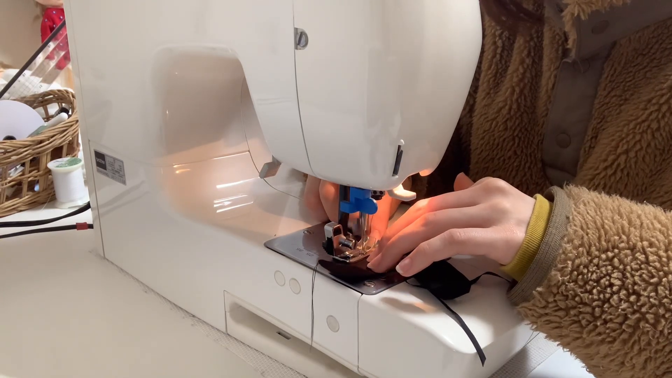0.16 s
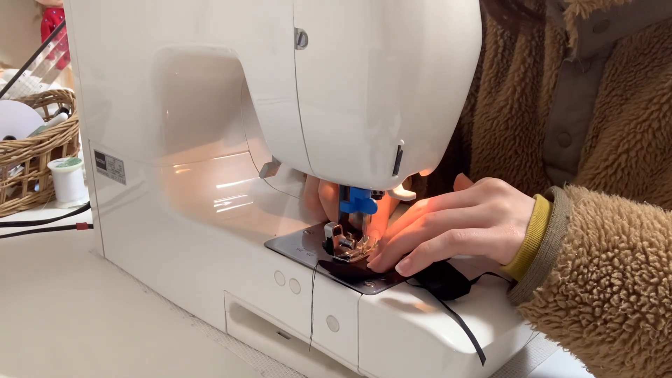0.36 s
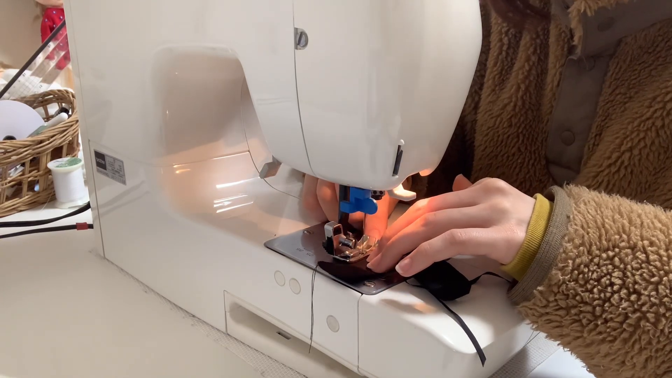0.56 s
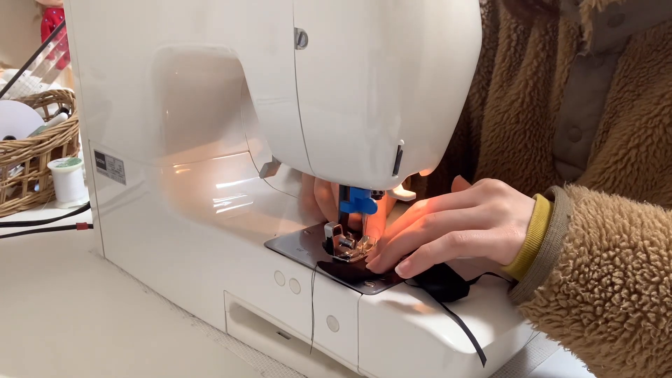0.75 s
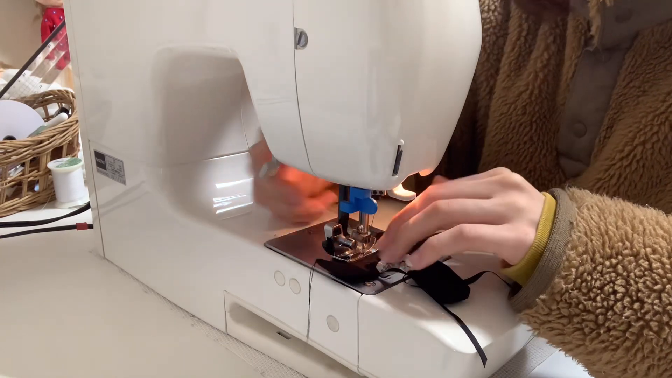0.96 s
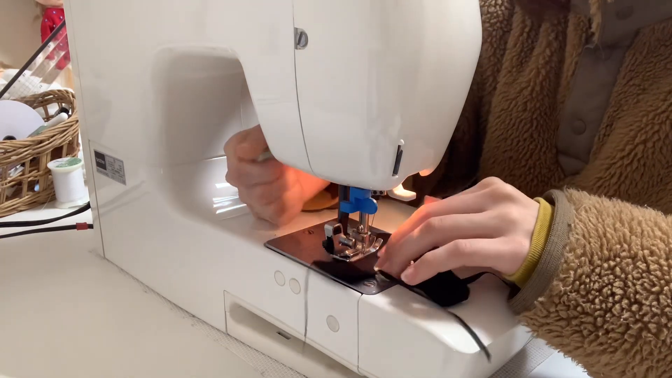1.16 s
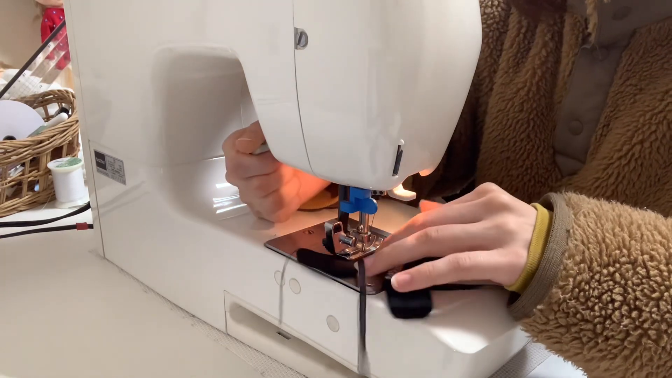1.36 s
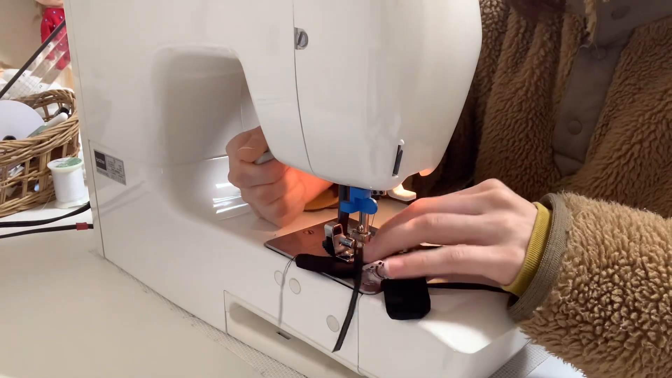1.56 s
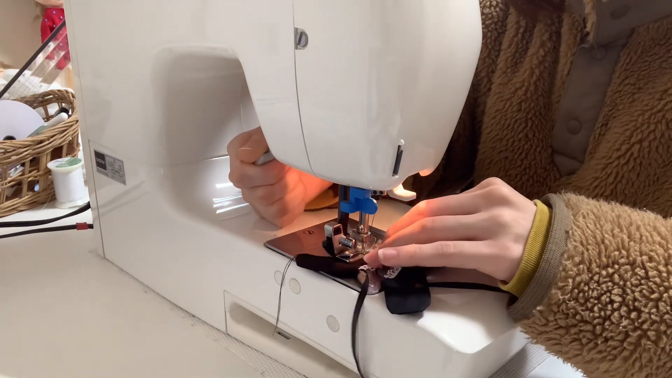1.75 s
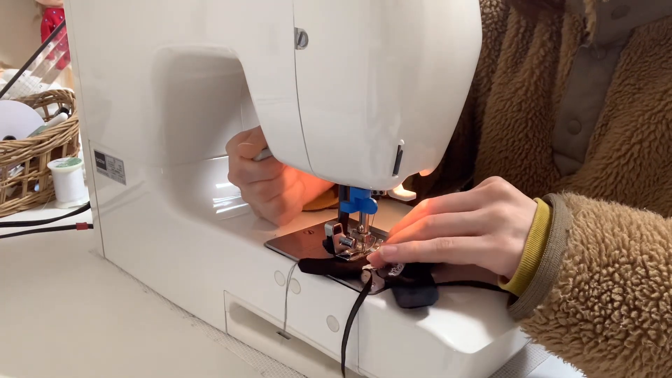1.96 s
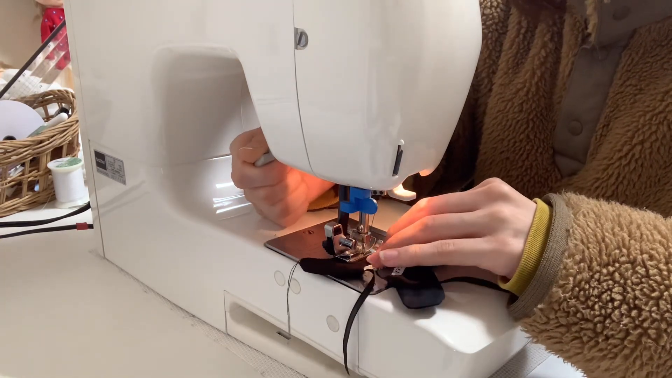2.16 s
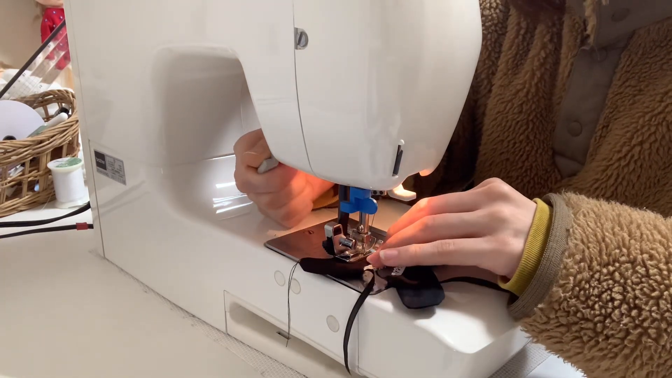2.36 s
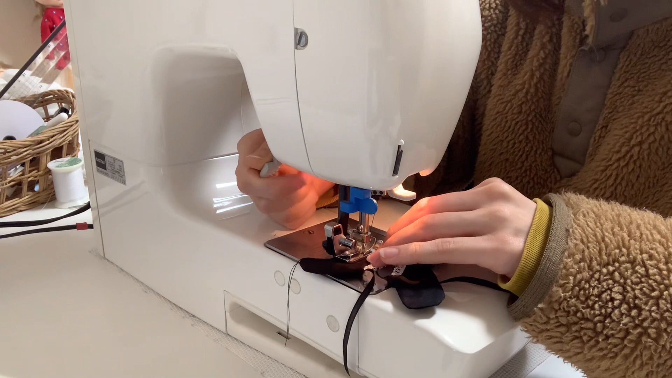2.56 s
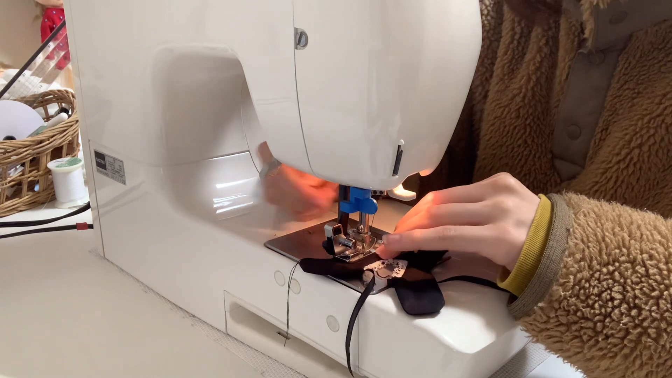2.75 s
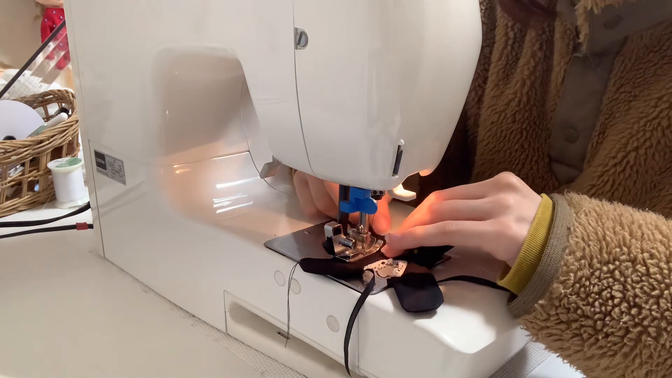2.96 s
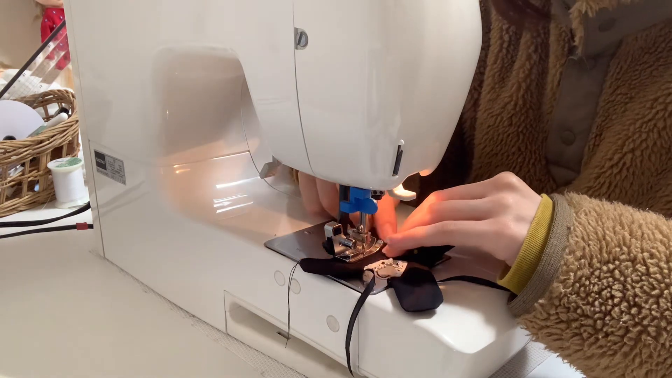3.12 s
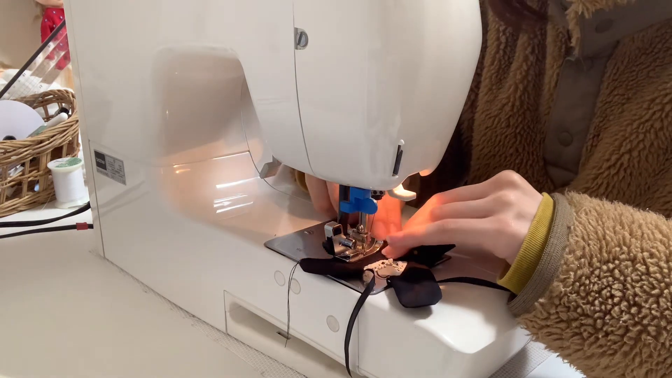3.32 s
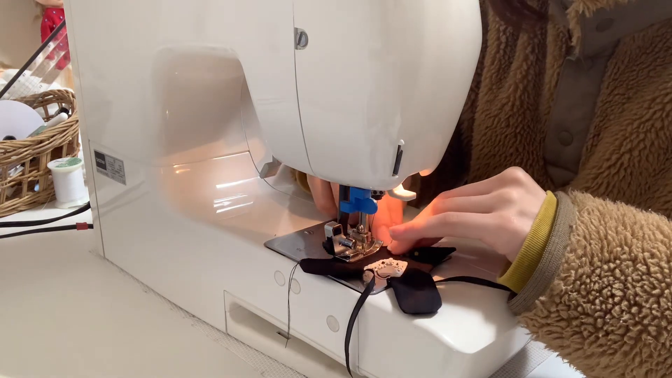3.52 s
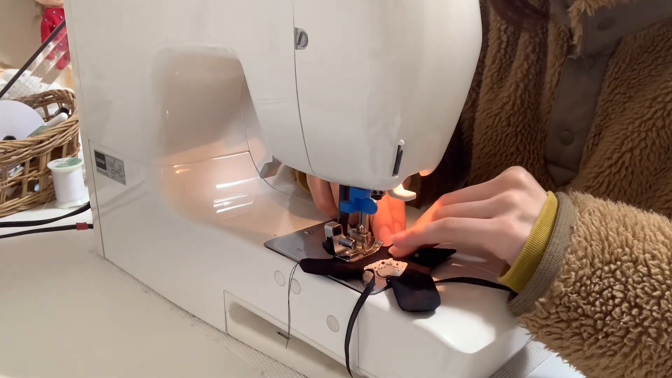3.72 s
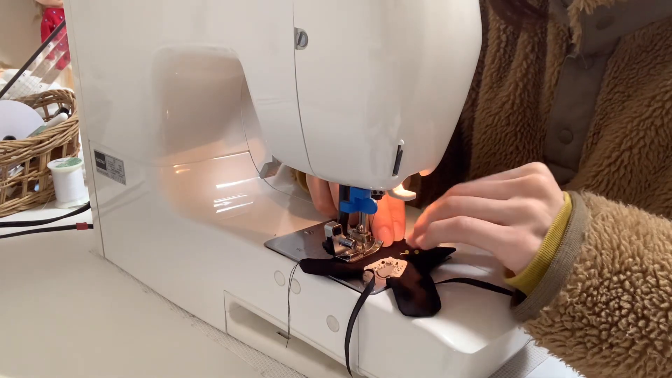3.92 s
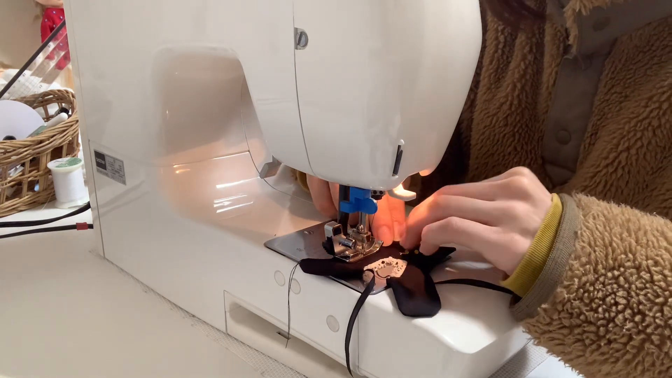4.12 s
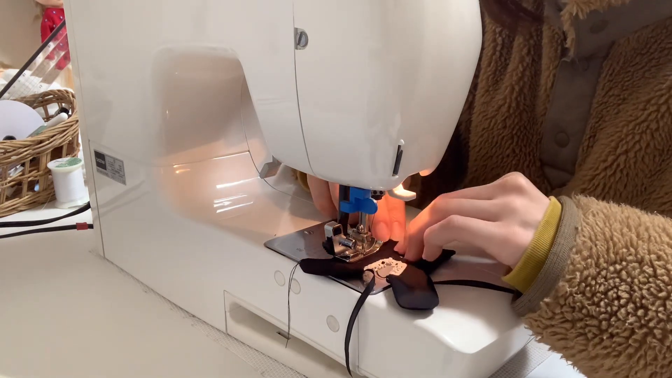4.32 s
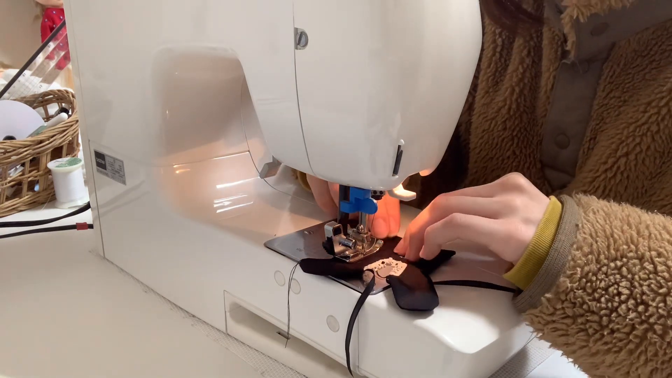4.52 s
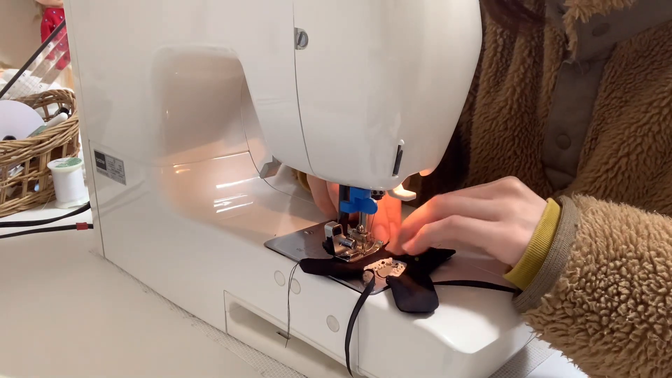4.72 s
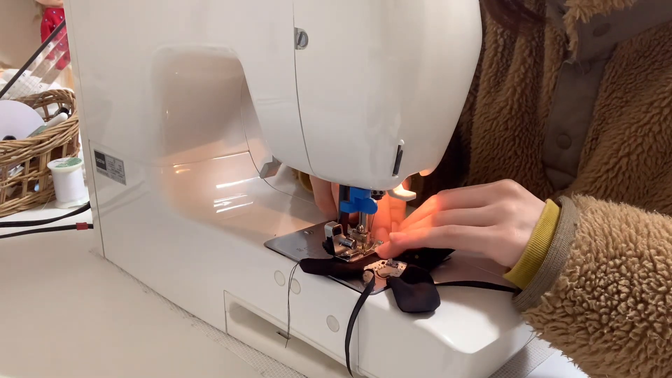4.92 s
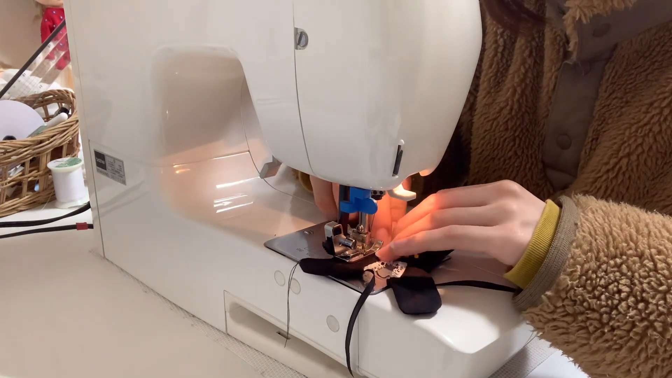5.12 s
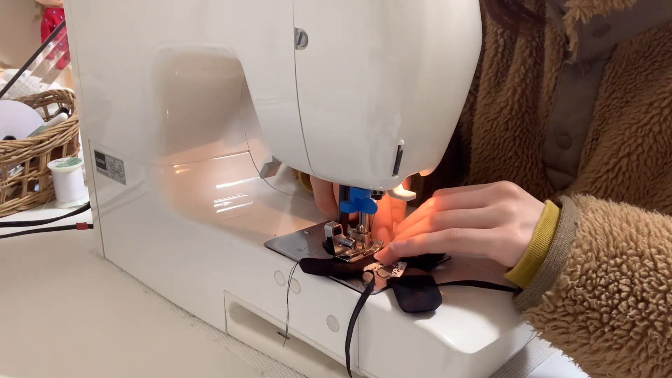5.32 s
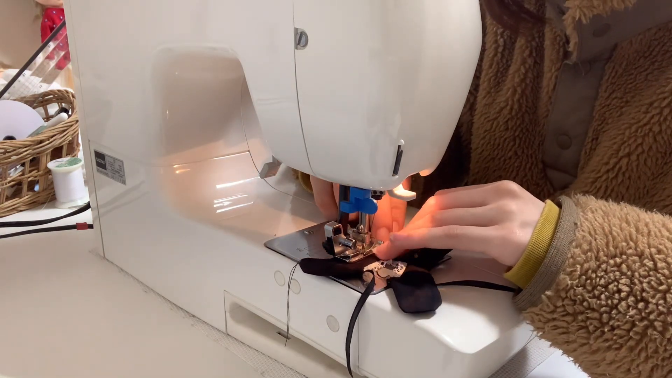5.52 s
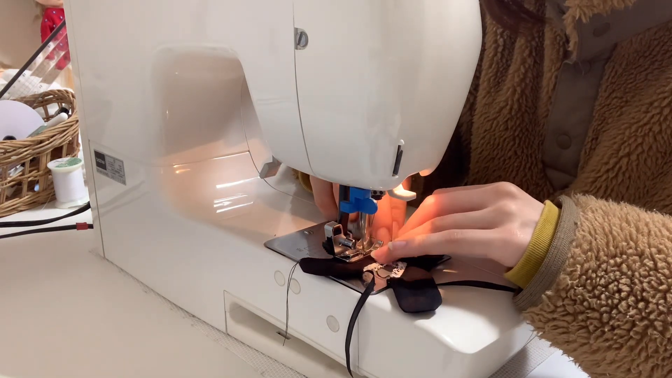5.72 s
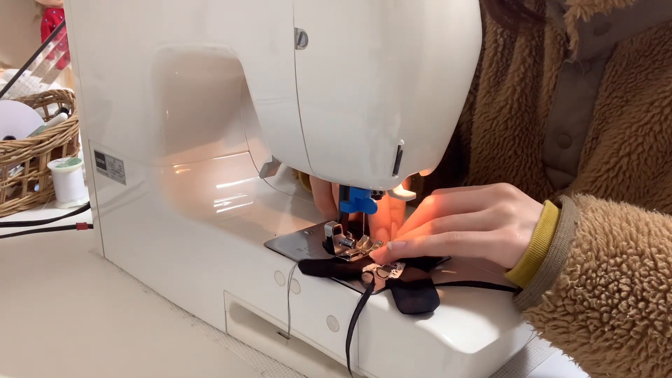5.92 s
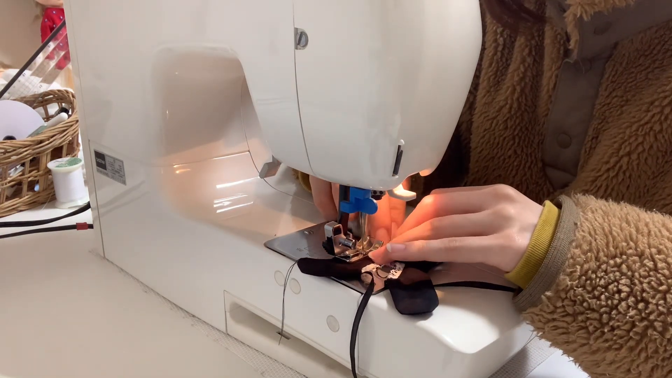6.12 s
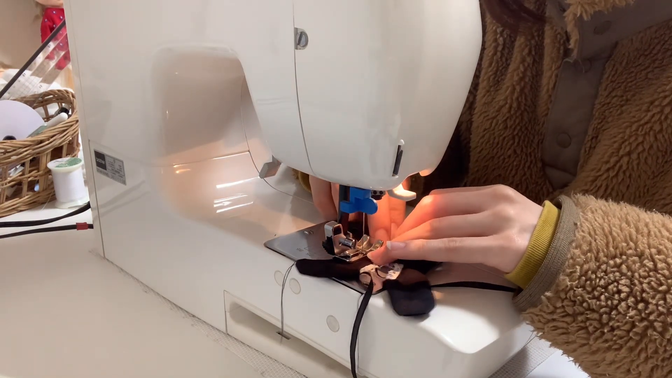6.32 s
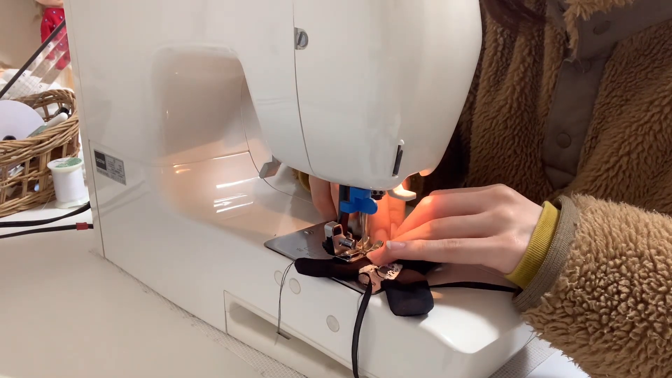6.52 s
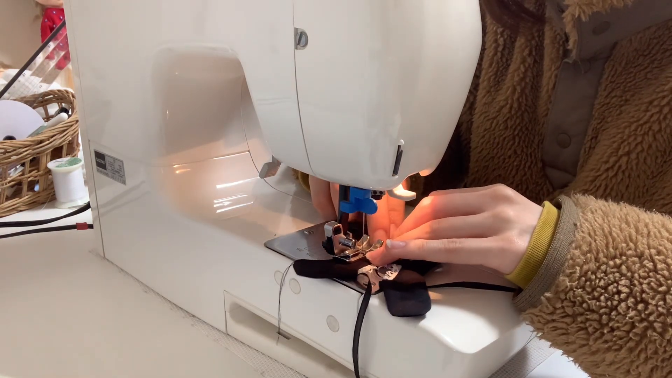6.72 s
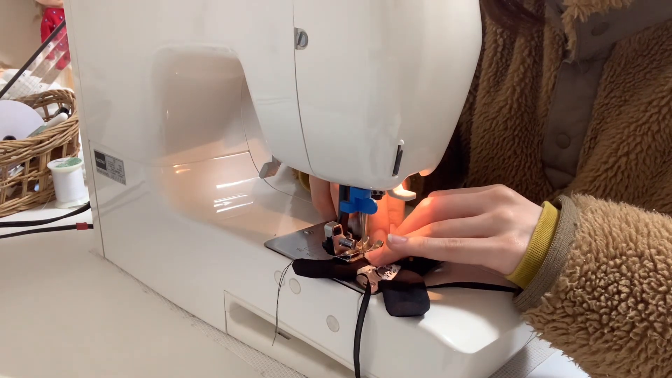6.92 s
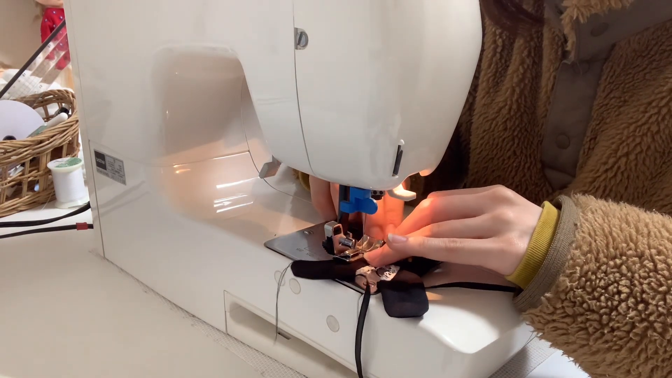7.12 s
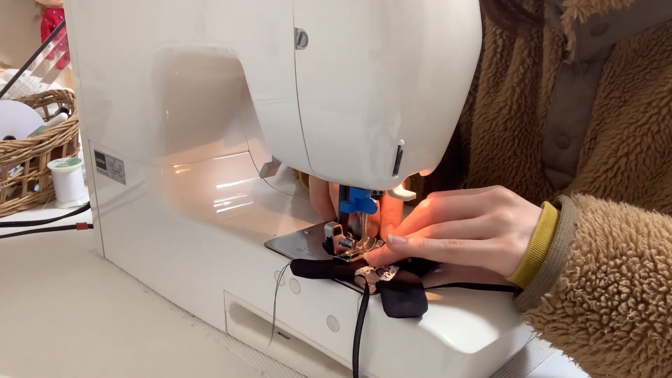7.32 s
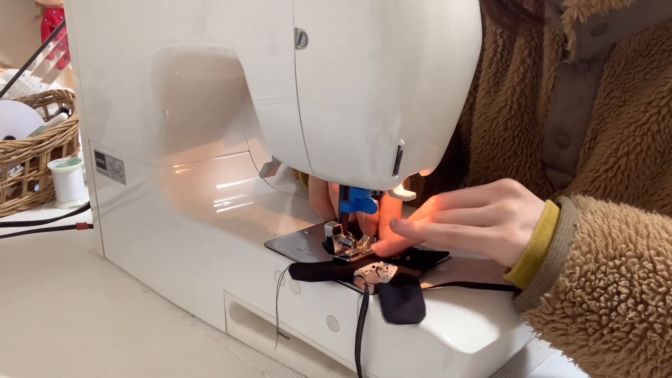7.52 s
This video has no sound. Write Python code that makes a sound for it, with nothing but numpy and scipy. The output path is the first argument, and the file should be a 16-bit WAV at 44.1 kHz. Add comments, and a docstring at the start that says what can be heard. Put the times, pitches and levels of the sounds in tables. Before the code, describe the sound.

Close sewing machine motor labours briefly and stops; hands shuffle fabric and small parts tap the bed, then slow rhythmic stitching resumes.

```python
"""A compact electric sewing machine labours for a second, close to a phone in a small room; after a pause it
runs again at 2.5 stitches a second. Motor and gear tones drone in the plastic casing, with whirr and belt hiss.
Filtered forces strike and rub casing, bed and steel modes: in each stitch the needle knocks, the thread loop
rasps round the hook and the feed dog scrapes. In the pause, coloured noise makes the rumble and rustle
of hands shifting the fabric, while a buckle and other small things tap on the bed."""
import sys
import numpy as np
from scipy import signal
from scipy.fft import rfft, irfft, next_fast_len
from scipy.io import wavfile
from scipy.ndimage import uniform_filter1d

SR = 44100
rng = np.random.default_rng(int(sys.argv[2]) if len(sys.argv) > 2 else 0)


def int16_out(signal):
    """Quantize to a 16-bit WAV file."""
    q = np.round(np.clip(np.atleast_2d(signal).T, -1, 1) * 32767)
    wavfile.write(sys.argv[1], SR, q.astype(np.int16))


N = 338247
TIME = np.arange(N) / SR
RING_TIME = np.arange(SR // 4) / SR  # a quarter second for each struck or rubbed sound

# Arrival at the phone's two ports: positive seconds reach the left first, negative the right.
STEEL_LEAD_S, BODY_LEAD_S = .000265, -.00006

# Dense short resonances of the small steel parts. Each row: frequency in Hz, level in dB.
STEEL_CRACK = [(1800, -27.5), (3200, 7), (4300, 1), (5400, -1), (7500, -0.5), (11000, -3), (15500, -12),
               (20000, -20)]
# Turns of the shaft, one a stitch. Each row: start in seconds, length of the turn in seconds, knocks of #
# linkage, take-up lever and needle in dB, thread loop in dB, length of its rasp in seconds, thread snap in dB,
# # feed dog in dB (all relative levels).
STITCH_TURNS = [(-0.074, 0.35, -2, 1.5, .033, -16, -1.5), (0.372, .675, -3, 0.5, 0.037, -13, -2),
                (5.772, 0.39, -2, -4, 0.022, -0.5, 3), (6.168, .398, -4, -2.5, 0.037, -1, 0.5),
                (6.568, .398, -1, -1, 0.049, -2, 0), (6.966, 0.4, 0, 1.5, 0.046, 2, -0.5),
                (7.364, .398, 1, -1.5, 0.028, 3, -0.5)]


def drive(buzz_db=-1, casing_db=-4.5, whirr_db=2.0, linkage_db=-4.5, throb=0.62, whirr_load=.5):
    """The motor buzzes at twice the mains rate; gears hum and chatter in the casing, the belt hisses."""
    # How hard the motor is driven, one table a run. Each row: time in seconds, effort in dB.
    runs = [
        [(0.0, 3.5), (0.17, -1), (0.3, -3.5), (0.44, -1.5), (0.53, 0.5), (0.9, -2), (0.95, -11), (1.0, -16.5)],
        [(5.6, -17), (5.67, -9.5), (5.76, 1.5), (5.9, 0), (7.67, -0.06)],
    ]
    # Chopped mains current in the motor. Each row: multiple of the buzz rate, relative level in dB.
    buzz_orders = [(1, -6.5), (2, -9.5), (3, -6), (4, -18.5), (5, -23.5), (6, -6.5), (7, -22.5), (12, -20),
                   (17, -20)]
    # Gear train. Each row: multiple of the gear tone, relative level in dB.
    mesh_orders = [(.5, -22.5), (1, -1.5), (1.5, -15), (2, -9.5), (2.5, -10.5), (3, -12), (4, -18),
                   (7, -23), (8, -20.5)]
    # Colour of the running noise. Each row: frequency in Hz, level in dB.
    whirr_colour = [(30, -28.5), (65, 8), (130, -10.5), (400, 10), (640, 10.5), (980, 0), (1400, -4.5),
                    (1700, -1), (2100, -3.5), (3200, -13.5), (5000, -21), (9000, -39)]
    # Colour of the belt hiss. Each row: frequency in Hz, level in dB.
    hiss_colour = [(1800, -11), (3200, -1), (4500, 4), (5400, -3), (8000, -7.5), (11000, -7), (15500, -12),
                   (20000, -28.5)]

    effort_db = np.interp(TIME, *np.transpose(np.vstack(runs)))
    switched_on = sum((TIME >= run[0][0]) & (TIME <= run[-1][0]) for run in runs)
    running = uniform_filter1d(1. * switched_on, SR // 30)
    load_hz, load_db, surge_db = load()
    # whirr and hiss grow faster than the hum, in dB per dB of effort
    hum = amp(-44.5 + effort_db + surge_db)
    whirr = amp(-54 + 1.15 * effort_db + whirr_load * load_db)
    hiss = amp(-65 + 1.95 * effort_db + load_db)

    # the gear tone sinks slowly (Hz per second), shifts with the load and wanders
    gear_hz = (216.9 - 1.2 * TIME + load_hz) * (1 + .018 * walk(35))
    gear_phase = 2 * np.pi * np.cumsum(gear_hz) / SR
    buzz_phase = 2 * np.pi * 100 * TIME + .16 * walk(13)  # 100 Hz, twice the mains rate
    tones = []
    for _ in range(2):
        buzz = amp(buzz_db) * stack(buzz_phase, buzz_orders, waver_db=3.5)
        tones.append(buzz + stack(gear_phase, mesh_orders, waver_db=3.5))

    # every torque pulse rattles the play in the gears
    chatter = (1 + throb * np.cos(buzz_phase)) * amp(1.8 * walk(130))
    shell = amp(casing_db) * shaken(casing, chatter)
    gears = amp(whirr_db) * wash(whirr_colour) * chatter
    gears += amp(linkage_db) * shaken(bed, chatter)
    belt = wash(hiss_colour, STEEL_LEAD_S) * amp(1.7 * walk(170))
    belt += amp(-7) * shaken(steel, chatter, STEEL_LEAD_S)
    return running * (hum * (ports(*tones) + shell) + whirr * gears + hiss * belt)


def load():
    """Change of the gear tone (Hz), belt hiss (dB) and hum (dB) as the shaft goes round."""
    # Each row: share of the turn, change of the gear tone in Hz, of the belt hiss in dB, of the hum in dB.
    load_cycle = [(.03, -4, -2, -1), (.15, 2, 2.5, 0), (.31, -6, 3, 2), (.42, 7, -2, -2), (.55, -2, 3, 0),
                  (.8, 6, -3, -0.5)]
    starts = [row[0] for row in STITCH_TURNS]
    starts.append(STITCH_TURNS[-1][0] + STITCH_TURNS[-1][1])
    turns = np.interp(TIME, starts, np.arange(len(starts)))
    turn, *columns = np.transpose(load_cycle)
    return [np.interp(turns, turn, c, period=1) for c in columns]


def stack(phase, orders, waver_db):
    """Partials of a rotating part, each wavering in strength."""
    coarse = TIME[::SR // 14]
    total = np.zeros(N)
    for multiple, db in orders:
        level = np.interp(TIME, coarse, amp(db + waver_db * noise(len(coarse))))
        total += level * np.sin(multiple * phase + 2 * np.pi * rng.random())
    return total


def shaken(response, chatter, lead=BODY_LEAD_S):
    """A body kept ringing by the chatter of the gears."""
    pair = [signal.fftconvolve(noise() * chatter, response())[:N] for _ in range(2)]
    return unit(ports(*pair, lead))


def stitches(free, damped, snap_db=-9.5):
    """Every turn of the shaft knocks, rasps, snaps and strokes the feed; a sliding contact damps the bed."""
    # Knocks from linkage, take-up lever and needle. Each row: share of the turn, then relative levels
    # of casing in dB, bed in dB, steel in dB.
    turn_knocks = [(0, -61, -52, -66), (.111, -58.5, -53, -59), (.219, -46, -45.5, -53)]
    # The thread snaps off two guides. Each row: share of the turn, relative level in dB.
    guide_snaps = [(.583, -56), (.613, -63.5)]
    # Colour of the feed dog's scrape. Each row: frequency in Hz, level in dB.
    feed_colour = [(100, -0.5), (260, 5), (480, -5.5), (690, 9), (880, -13), (1130, 9), (1600, -9.5),
                   (4000, -5.5), (9000, -1.5), (12500, 3.5), (16000, 3)]
    # share of the turn; relative levels of casing, bed and steel in dB
    loop_turn, loop_levels = .364, (-40.5, -42.5, -51)
    feed_turn, feed_levels, feed_s = .726, (-41.5, -41, -56), 0.034
    snap_colour = [(3000, -9.5), (7000, 0.5), (15000, 5)]  # Hz, dB

    out = np.zeros((2, N))
    for start, turn_s, knocks_db, loop_db, rasp_s, thread_db, feed_db in STITCH_TURNS:
        for turn, *levels in turn_knocks:
            if start + turn * turn_s >= 0:
                add(out, start + turn * turn_s, amp(knocks_db) * knock(free, levels))
        # the thread loop is dragged round the bobbin case
        loop = excite(rasp(rasp_s), damped, loop_levels, rasp_s)
        add(out, start + loop_turn * turn_s, amp(loop_db) * loop)
        for turn, db in guide_snaps:
            snap = [colour(crack(STEEL_CRACK, t60=0.016, room_db=-20.5, room_t60=0.22), snap_colour)
                    for _ in range(2)]
            level = amp(snap_db + db + thread_db)
            add(out, start + turn * turn_s, level * unit(ports(*snap, STEEL_LEAD_S)))
        scrape = slide(feed_s, feed_colour, grain_db=1.5, rise=0.59)
        stroke = excite(scrape, damped, feed_levels, feed_s)
        add(out, start + feed_turn * turn_s, amp(feed_db) * stroke)
    return out


def knock(free, levels):
    """A loose part strikes, bounces and lets the machine ring freely."""
    # Colour of a needle knock. Each row: frequency in Hz, level in dB.
    knock_colour = [(100, -4.5), (300, -2.5), (800, -2.5), (1300, 4.5), (1800, 0), (2600, -3), (5000, 1),
                    (16000, -2.5)]
    return excite(blow(knock_colour, spread_s=.003, bounce=.65), free, levels)


def blow(push, spread_s, bounce, count=5):
    """Force of a loose part: one contact and a few weaker bounces."""
    force = np.zeros(SR // 20)
    delays = np.minimum(spread_s * rng.exponential(size=count), .04)
    force[(delays * SR).astype(int)] = bounce * rng.uniform(-0.99, 1, count)
    force[0] = 1
    return colour(force, push)


def rasp(length, catch_hz=52, catch=0.39):
    """Force of thread dragged over steel: its grip swells and eases as it catches and slips."""
    # Colour of the thread's slide. Each row: frequency in Hz, level in dB.
    loop_colour = [(100, -0.5), (160, 9.5), (500, -4), (800, -5), (1150, 3), (1700, -11.5), (4000, -1.5),
                   (8000, 4.5), (10800, 10), (16000, 2.5)]
    force = slide(length, loop_colour, grain_db=4.5, rise=0.73)
    return force * (1 - catch * np.cos(2 * np.pi * catch_hz * RING_TIME[:len(force)]))


def slide(length, push, grain_db, rise):
    """Force of a sliding contact: uneven tiny slips that swell and let go."""
    t = RING_TIME[:SR // 12] / length
    envelope = np.sin(np.pi * np.minimum(t, 1) ** rise) ** 2
    grain = np.repeat(noise(len(t)), SR // 1000)[:len(t)]  # a new strength each millisecond
    slips = noise(len(t)) * amp(grain_db * grain)
    return colour(slips * np.sqrt(envelope), push)


def labouring(free, damped):
    """Knocks and snags that fall outside the stitch cycle."""
    # Uneven knocks as the needle labours through thick layers and the drive takes up.
    # Each row: start in seconds, casing in dB, bed in dB, steel in dB.
    uneven_knocks = [(0.027, -34, -42.5, -50.5), (0.08, -37.5, -34.5, -48.5), (0.092, -40, -37, -56.5),
                     (0.112, -59, -53, -57.5), (0.153, -45, -36.5, -55.5), (0.354, -56.5, -41.5, -66),
                     (0.47, -49.5, -50.5, -58), (0.549, -56, -43.5, -59), (0.56, -59.5, -36, -55),
                     (0.604, -45, -41, -61), (0.72, -56.5, -46, -71), (0.735, -43, -54, -64),
                     (0.765, -61, -42, -69), (0.775, -56, -36.5, -55), (0.8132, -50.5, -34, -49.5),
                     (0.902, -47, -36.5, -52.5), (5.479, -47, -49.5, -59), (5.615, -61, -75, -80),
                     (5.689, -68, -65, -74.5), (5.712, -46.5, -55.5, -85)]
    # Thread and fabric jerk taut. Each row: start in seconds, length in seconds, level in dB.
    taut_snags = [(5.469, 0.0232, -42), (5.905, 0.014, -38.5), (6.084, 0.017, -39)]
    out = np.zeros((2, N))
    for s, *levels in uneven_knocks:
        add(out, s, knock(free, levels))
    for s, length, db in taut_snags:
        snag = excite(rasp(length), damped, (0, -1.5, -9), length)  # casing, bed, steel in dB
        add(out, s, amp(db) * snag)
    return out


def handling(damped, tap_db=-1, part_t60=0.086, scuff_db=-15, rumble_db=3.5, rustle_db=1.0):
    """Fabric slides, arms shake the table, and small things tap the bed."""
    # Hands moving the fabric. Each row: time in seconds, table rumble in dB, rustle in dB (relative levels).
    hand_moves = [(1.0, -64.5, -70), (1.33, -62.5, -78), (1.61, -72, -79.5), (2.18, -68.5, -80),
                  (2.84, -64, -72.5), (3.1, -68, -77), (4.32, -72.5, -82), (4.73, -69.5, -77.5),
                  (4.84, -71, -73), (5.25, -71.5, -75), (5.51, -71, -66.5), (5.6, -70, -62)]
    # Colour of the table's rumble. Each row: frequency in Hz, level in dB.
    rumble_colour = [(18, -21.5), (32, -6.5), (48, 3), (70, -0.5), (98, 3.5), (135, -6.5), (220, -18),
                     (400, -49.5)]
    # Colour of the fabric's rustle. Each row: frequency in Hz, level in dB.
    rustle_colour = [(120, 0.5), (250, 3), (420, -2.5), (650, 0), (1000, -12.5), (1700, -18), (3500, -32.5),
                     (8000, -38.5)]
    # Lever, fingers and buckle on the machine. Each row: time in seconds, relative level in dB, casing thud
    # relative to it in dB, contact hardness in Hz, pitch of the struck part in Hz.
    small_taps = [(1.066, -70.5, 1, 595, 603), (1.113, -50.5, 0.5, 2500, 2460), (1.126, -52, 3, 1190, 504),
                  (1.143, -61.5, 9, 2510, 496), (1.187, -69, 3, 3140, 3800), (1.29, -53.5, 6, 2520, 714),
                  (1.545, -65, -2, 3020, 660), (1.884, -67, -12, 2710, 4980), (1.905, -71.5, -2, 1196, 900),
                  (2.127, -58.5, -2.5, 1410, 597), (2.553, -67, -2, 2780, 690), (2.598, -71.5, 6, 700, 690),
                  (2.72, -64.5, -14, 2300, 695), (2.741, -71.5, -1, 1500, 697),
                  (2.856, -51.5, -1, 1860, 927), (2.95, -62, 1.5, 800, 683), (3.245, -67.5, 0.5, 944, 682),
                  (3.815, -74.5, 8.5, 1300, 520), (3.96, -72.5, 3.5, 896, 523), (4.416, -76, 12, 900, 525),
                  (4.676, -65.5, 1, 1400, 520), (4.751, -62.5, -3, 850, 672), (4.879, -75.5, 6, 750, 526)]
    # Colour of a finger or lever tap. Each row: frequency in Hz, level in dB.
    tap_colour = [(100, -2.5), (300, 1.5), (700, 2.5), (1500, -3.5), (2200, -6.5), (3500, -3.5),
                  (5000, -3.5), (8000, -2), (15000, 5)]

    s, *columns = np.transpose(hand_moves)
    rumble, rustle = (amp(np.interp(TIME, s, c, left=-75, right=-75)) for c in columns)
    out = amp(rumble_db) * rumble * wash(rumble_colour)
    out += amp(rustle_db) * rustle * wash(rustle_colour) * amp(2.4 * walk(45))
    for s, db, thud_db, hardness_hz, hz in small_taps:
        # a harder contact wakes more of the steel and less of the struck part's own note
        octaves = np.log2(hardness_hz / 1500)  # above a medium hardness
        steel_db, note_db = -21 + 14.5 * octaves, -13 - 8 * octaves
        # the contact grazes the surface, and the fabric scuffs on for a moment
        graze = slide(0.016, tap_colour, grain_db=3, rise=0.61)
        scuff = colour(noise(len(graze)) * fade(0.18)[:len(graze)], tap_colour)
        # a softer touch sounds duller
        softness = signal.butter(2, min(2 * hardness_hz, SR / 3), fs=SR)
        force = signal.lfilter(*softness, graze + amp(scuff_db) * scuff)
        add(out, s - .002, amp(tap_db + db) * excite(force, damped, (thud_db, 0, steel_db)))
        # the struck part rings briefly at its own pitch
        part = ring([(hz, 0, part_t60), (1.07 * hz, -6, part_t60)], detune=0.0048, scatter_db=0.0)
        part = part * -np.expm1(-RING_TIME / 0.00083)  # soft onset
        add(out, s, amp(db + note_db) * unit(np.array([part, part])))
    return out


def room_air():
    """The still room: steady coloured noise at both ports."""
    # Colour of the still room. Each row: frequency in Hz, level in dB.
    air_colour = [(20, 10), (200, 13.5), (1000, 10.5), (2500, 0.5), (6500, -2.5), (9500, -2), (13000, -4.5),
                  (15500, -17)]
    return amp(-81.5) * wash(air_colour, STEEL_LEAD_S)


def casing():
    """Response of the plastic casing on the table, too small to radiate deep bass."""
    # Each row: nominal frequency in Hz, level in dB, time to decay by 60 dB in seconds.
    casing_modes = [(72, -15, .2), (160, -6, 0.23), (215, -1, 0.18), (261.4, -1, 0.15), (286.4, -1.5, 0.13),
                    (313.8, -2, .13), (379.2, -5.5, 0.12), (428, -11.5, 0.081)]
    # How well the casing radiates. Each row: frequency in Hz, level in dB.
    radiation = [(25, -36.5), (60, -4.5), (130, -1), (450, 0), (900, -10), (3000, -28)]
    modes = ring(casing_modes, detune=0.0091, scatter_db=1.5)
    dense = crack(radiation, t60=0.058, room_db=-9.0, room_t60=0.22)
    return colour(modes + amp(-6) * dense, radiation)


def bed(modes_db=0):
    """Response of the bed, needle plate and linkage: modes and a crack."""
    # Each row: nominal frequency in Hz, level in dB, time to decay by 60 dB in seconds.
    bed_modes = [(528.6, -1.5, 0.133), (591, -4, .11), (693.4, 4.5, 0.054), (784, -7, 0.2),
                 (882.6, -1, 0.085), (1130, -6.5, .07), (1216, -6, 0.07), (1283, -14, 0.082),
                 (1421, -9, 0.11), (1545, -7.5, 0.12), (1667, 1, 0.086), (1798, -2.5, 0.11),
                 (1855, -4.5, 0.087), (2150, -11.5, 0.048), (2166, -7, 0.085), (2639, -10.5, 0.12),
                 (2910, -13, 0.12), (3228, -22.5, 0.13)]
    # Dense short resonances of the bed. Each row: frequency in Hz, level in dB.
    bed_crack = [(300, -20.5), (500, 4.5), (1200, -0.5), (1900, 2), (2500, -4), (3500, -21.5),
                 (5000, -24.5), (9000, -40.5)]
    dense = crack(bed_crack, t60=0.031, room_db=-10.0, room_t60=0.23)
    return amp(modes_db) * ring(bed_modes) + amp(-4.0) * dense


def steel(modes_db=-7):
    """Response of the small steel parts: a crack and high modes."""
    # Presser foot, needle bar and buckle. Each row: nominal frequency in Hz, level in dB,
    # time to decay by 60 dB in seconds.
    small_part_modes = [(3750, -0.5, .1), (4160, 0, 0.12), (4576, -4, 0.1012), (5030, -6, 0.068),
                        (6290, -4, 0.122), (7300, -4.5, .1), (10200, -1, 0.037), (10800, -4, 0.032),
                        (12680, 0, 0.062), (15000, -1.5, 0.046)]
    dense = crack(STEEL_CRACK, t60=0.014, room_db=-15.5, room_t60=0.17)
    return dense + amp(modes_db) * ring(small_part_modes, detune=.003, scatter_db=1.0)


def responses(modes_db, count=8):
    """Stereo responses of casing, bed and steel parts at several points of contact."""
    points = []
    for _ in range(count):
        plastic = ports(casing(), casing())
        plate = ports(bed(modes_db), bed(modes_db))
        points.append((plastic, plate, ports(steel(), steel(), STEEL_LEAD_S)))
    return points


def excite(force, points, levels, length=0.022):
    """A force sounds casing, bed and steel at a random point; levels (dB) are rms over the contact."""
    paths = np.array(points[rng.integers(len(points))])
    y = signal.fftconvolve(paths, force[None, None], axes=2)[:, :, :len(RING_TIME)]
    rms = np.sqrt(np.mean(y[:, :, :int(length * SR)] ** 2, axis=(1, 2)))
    return np.tensordot(amp(levels) / rms, y, axes=1) * dying()


def dying():
    """Brings the last half of a ring steadily to rest."""
    return np.minimum(1, 2 * (1 - RING_TIME / RING_TIME[-1]))


def ring(modes, detune=.008, scatter_db=3.0):
    """Decaying modes; each response differs a little in pitch, strength and sign."""
    hz, db, t60 = np.transpose(modes)[:, :, None]
    a, b, c = rng.standard_normal((3, len(modes), 1))
    angle = (2 * np.pi * hz * (1 + detune * a) * RING_TIME).astype(np.float32)
    decay = np.exp((-np.log(1000) / t60 * RING_TIME).astype(np.float32))
    strength = np.sign(c) * amp(db + scatter_db * b)
    return unit(np.sum(strength * np.sin(angle) * decay, axis=0))


def crack(points, t60, room_db, room_t60):
    """Dense resonances that die fast, with the longer decay of the room."""
    decay = fade(t60) + amp(room_db) * fade(room_t60)
    return unit(colour(noise(len(RING_TIME)) * decay, points))


def fade(t60):
    """Exponential decay by 60 dB in t60 seconds."""
    return np.exp(-np.log(1000) * RING_TIME / t60)


def ports(direct, scattered, lead=BODY_LEAD_S):
    """Left and right: the sound reaches one port first, its scattered part fills the sides."""
    # Share that reaches the two ports by unrelated paths. Each row: frequency in Hz, level in dB.
    diffuse_share = [(40, -10.5), (250, -15.5), (500, -6.5), (1200, -12), (2200, -1), (5000, -4),
                     (7500, -3.5), (9500, -26), (16000, -18.5)]
    size = next_fast_len(len(direct))
    hz = np.fft.rfftfreq(size, 1 / SR)
    share = gains(diffuse_share, hz)
    delay = np.exp(-2j * np.pi * hz * abs(lead))
    mid, side = rfft(direct, size), share * rfft(scattered, size)
    spectra = np.array([mid + side, (mid - side) * delay]) / np.hypot(1, share)
    pair = irfft(spectra, size)[:, :len(direct)]
    return pair if lead > 0 else pair[::-1]


def wash(points, lead=BODY_LEAD_S):
    """Coloured noise at both ports."""
    return unit(ports(colour(noise(), points), colour(noise(), points), lead))


def add(out, s, sound):
    """Mix a sound in at time s."""
    start = max(int(s * SR), 0)
    out[:, start:start + sound.shape[1]] += sound[:, :N - start]


def walk(hz):
    """Slow random wander with an rms of 1."""
    k = int(SR / hz)
    steps = np.repeat(noise(N // k + 1), k)
    return unit(uniform_filter1d(uniform_filter1d(steps, k), k)[:N])


def colour(x, points):
    """Causal minimum-phase filter with a (Hz, dB) response."""
    cepstrum = irfft(np.log(gains(points, np.fft.rfftfreq(4096, 1 / SR))))
    cepstrum[1:] *= 2
    cepstrum[len(cepstrum) // 2:] = 0
    return signal.fftconvolve(x, irfft(np.exp(rfft(cepstrum))))[:len(x)]


def gains(points, hz):
    """A (Hz, dB) spectrum read at the given frequencies."""
    f, db = np.transpose(points)
    return amp(np.interp(np.log(np.maximum(hz, 1)), np.log(f), db))


def noise(size=N):
    """White noise."""
    return rng.standard_normal(size)


def unit(x):
    """Scale to rms 1."""
    return x / np.sqrt(np.mean(x ** 2))


def amp(db):
    """Decibels to gain."""
    return 10 ** (np.asarray(db) / 20)


def scene():
    """Machine, hands and room air."""
    free, damped = responses(modes_db=-0.6), responses(modes_db=-4)
    machine = drive() + stitches(free, damped) + labouring(free, damped)
    return machine + handling(damped) + room_air()


def record(dry):
    """The phone cuts the top above 15.9 kHz."""
    return signal.sosfilt(signal.ellip(10, .2, 70, 15900, fs=SR, output="sos"), dry)


dry = scene()
out = record(dry)
int16_out(out)
```